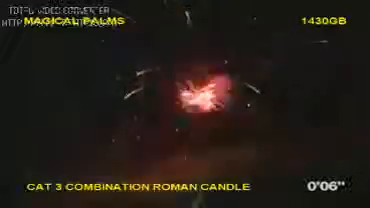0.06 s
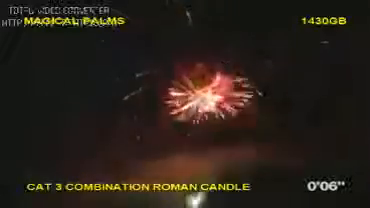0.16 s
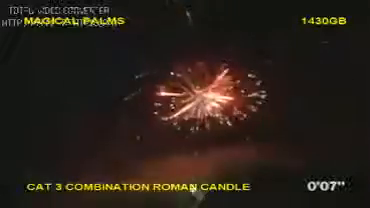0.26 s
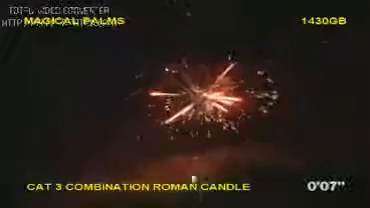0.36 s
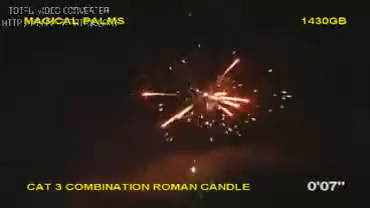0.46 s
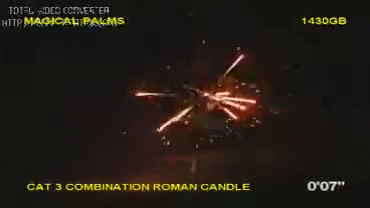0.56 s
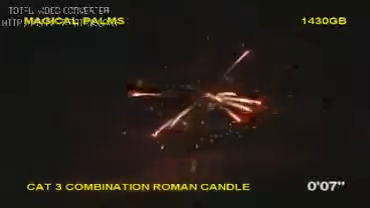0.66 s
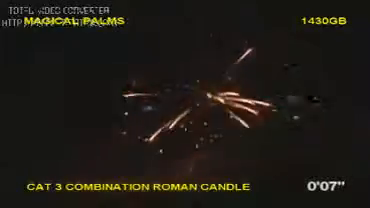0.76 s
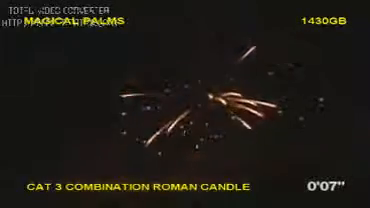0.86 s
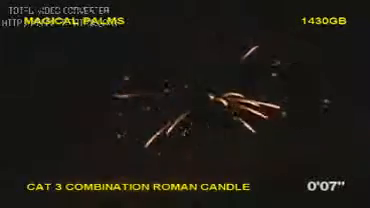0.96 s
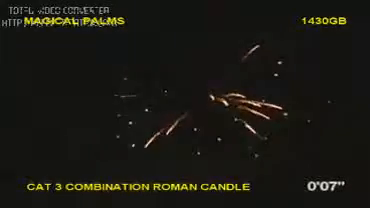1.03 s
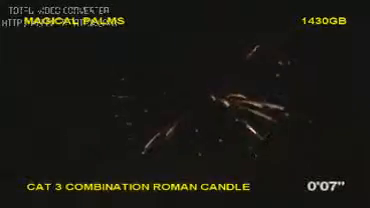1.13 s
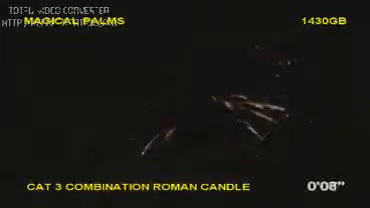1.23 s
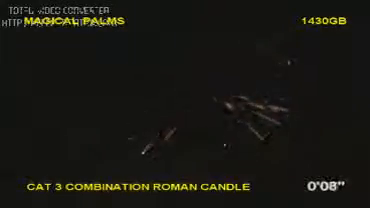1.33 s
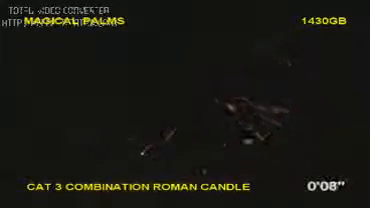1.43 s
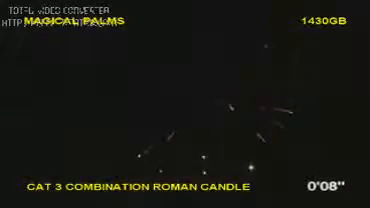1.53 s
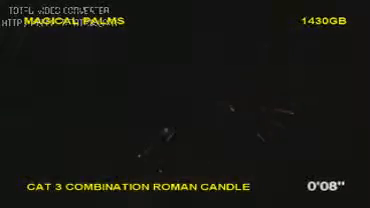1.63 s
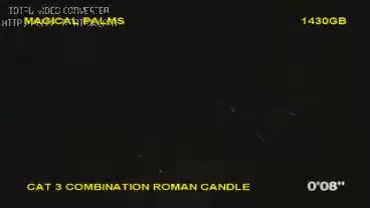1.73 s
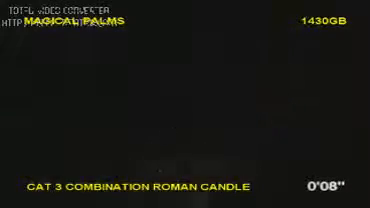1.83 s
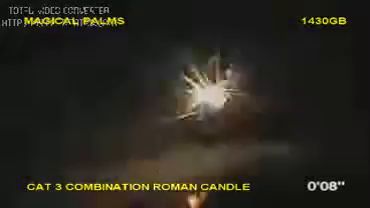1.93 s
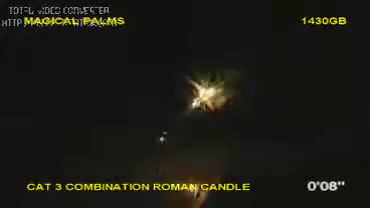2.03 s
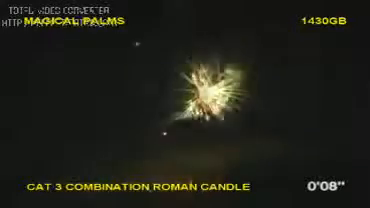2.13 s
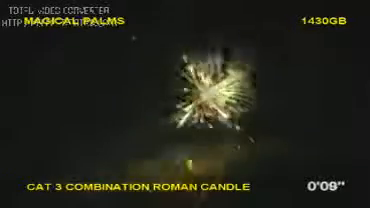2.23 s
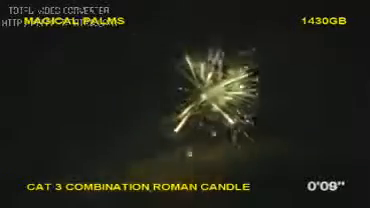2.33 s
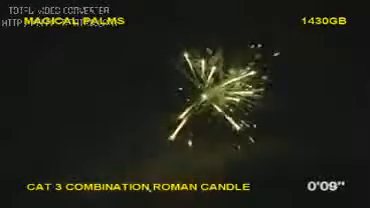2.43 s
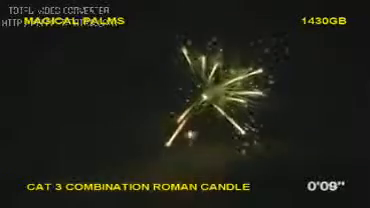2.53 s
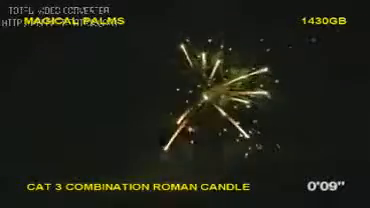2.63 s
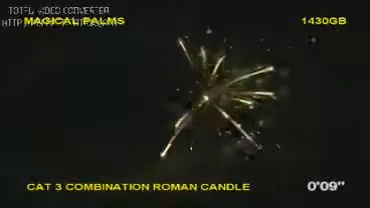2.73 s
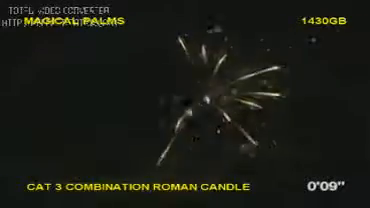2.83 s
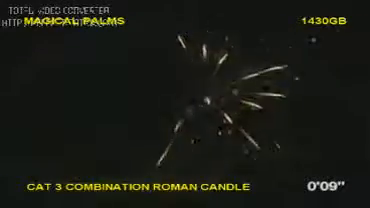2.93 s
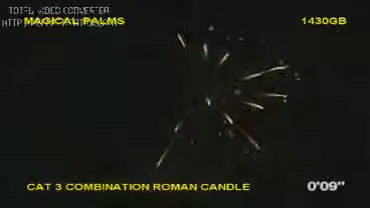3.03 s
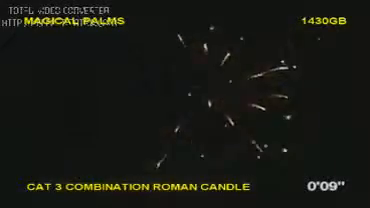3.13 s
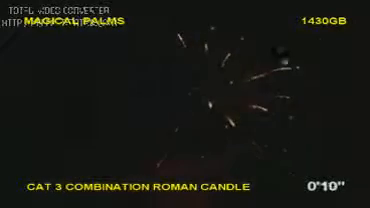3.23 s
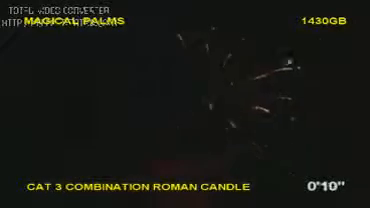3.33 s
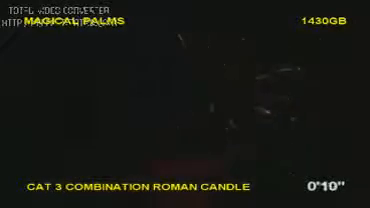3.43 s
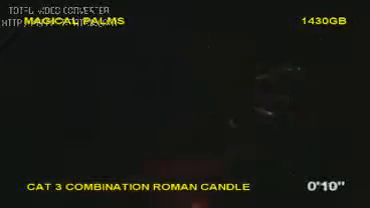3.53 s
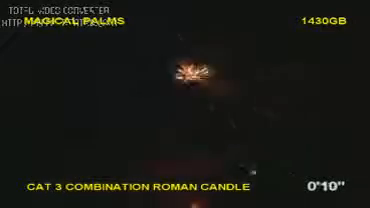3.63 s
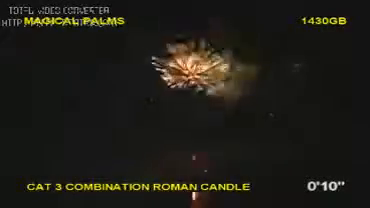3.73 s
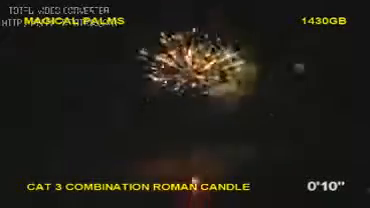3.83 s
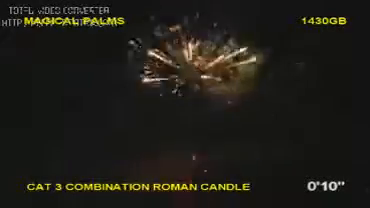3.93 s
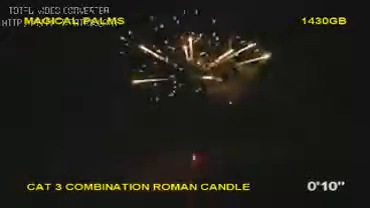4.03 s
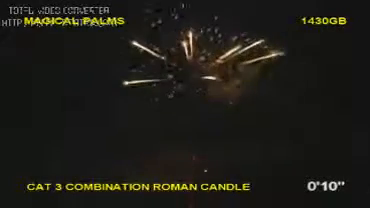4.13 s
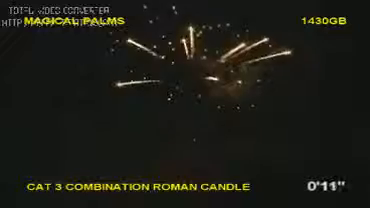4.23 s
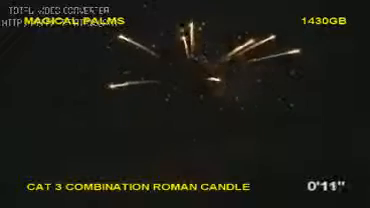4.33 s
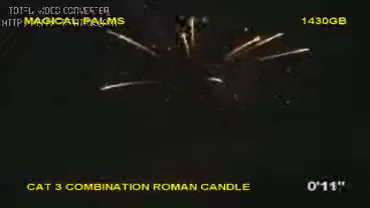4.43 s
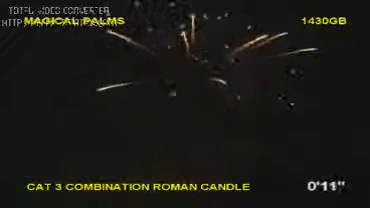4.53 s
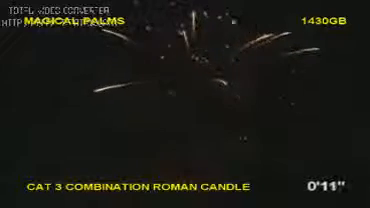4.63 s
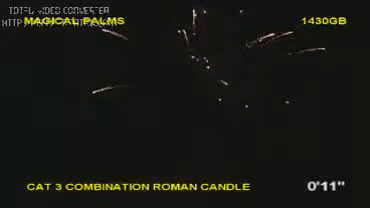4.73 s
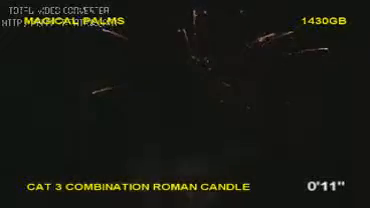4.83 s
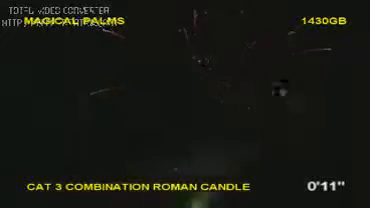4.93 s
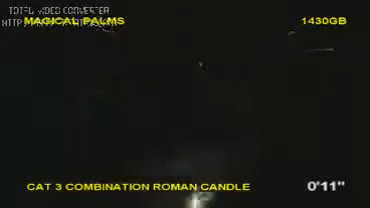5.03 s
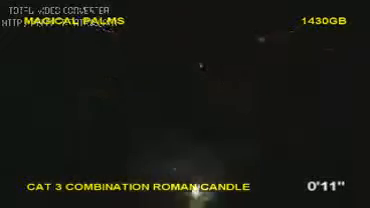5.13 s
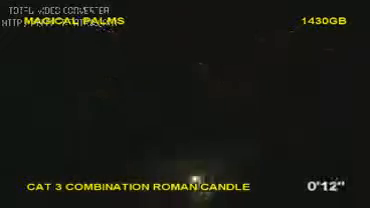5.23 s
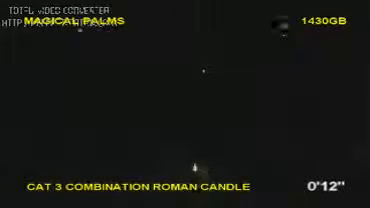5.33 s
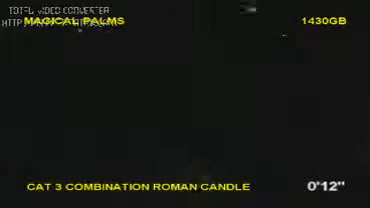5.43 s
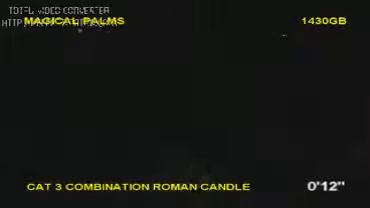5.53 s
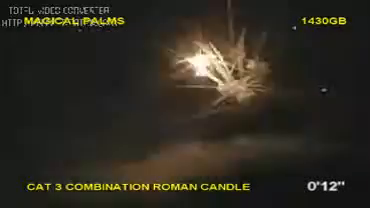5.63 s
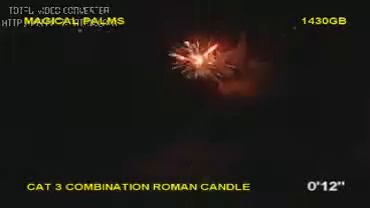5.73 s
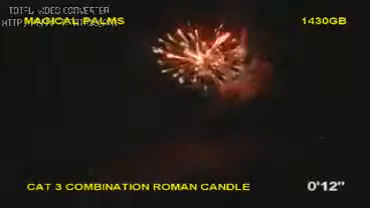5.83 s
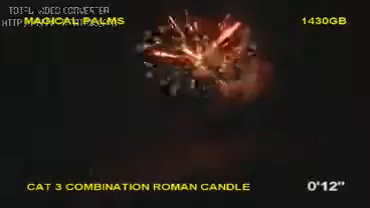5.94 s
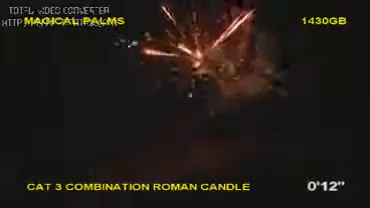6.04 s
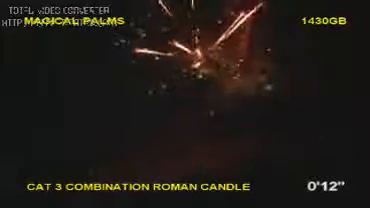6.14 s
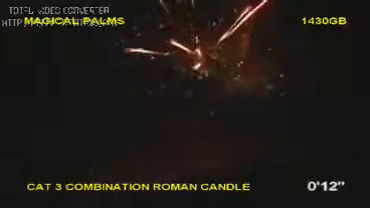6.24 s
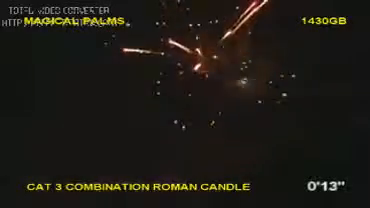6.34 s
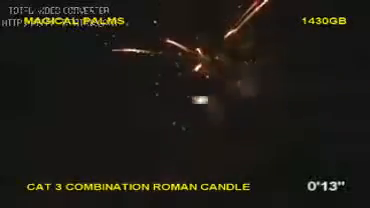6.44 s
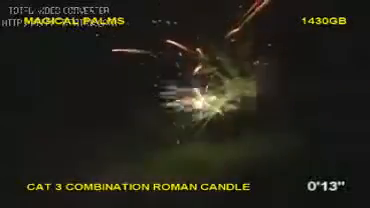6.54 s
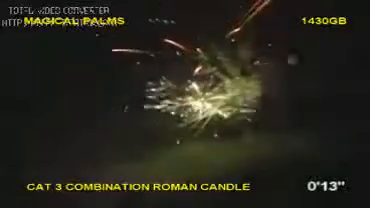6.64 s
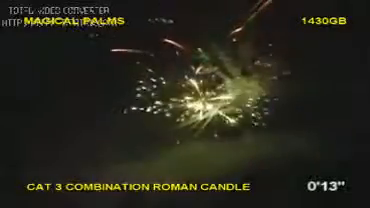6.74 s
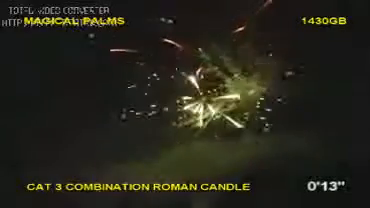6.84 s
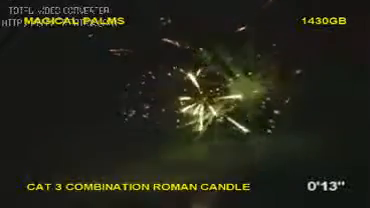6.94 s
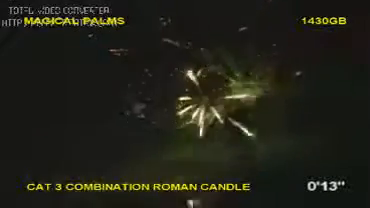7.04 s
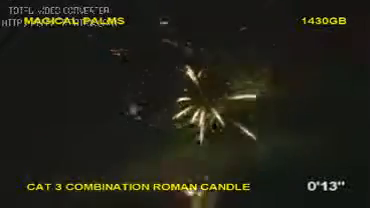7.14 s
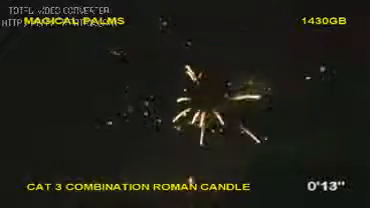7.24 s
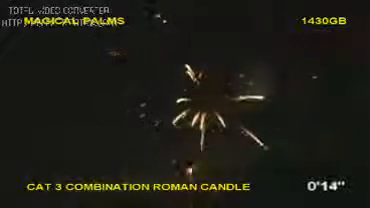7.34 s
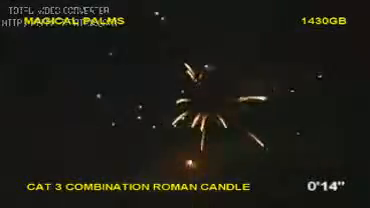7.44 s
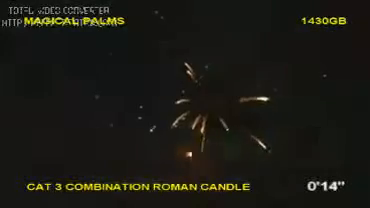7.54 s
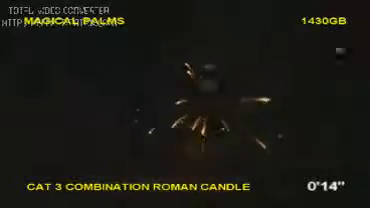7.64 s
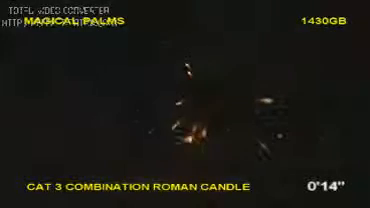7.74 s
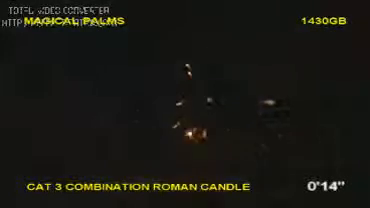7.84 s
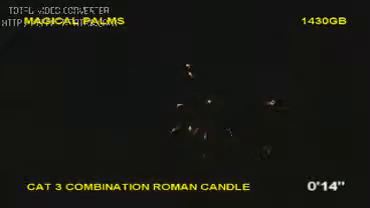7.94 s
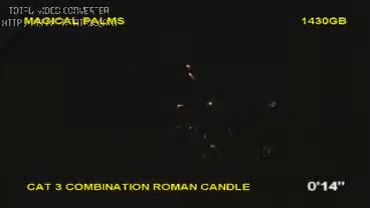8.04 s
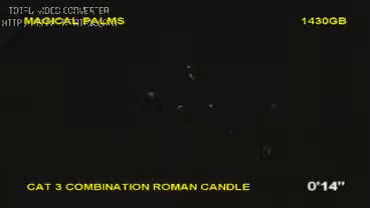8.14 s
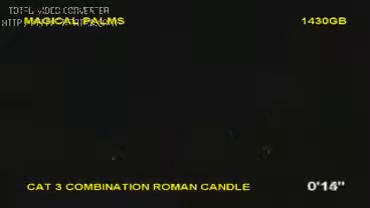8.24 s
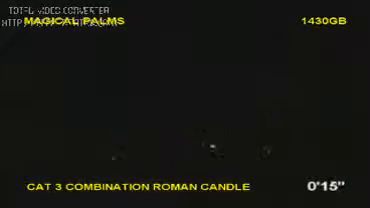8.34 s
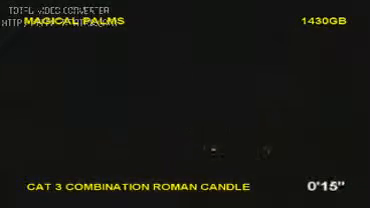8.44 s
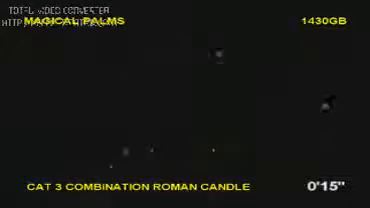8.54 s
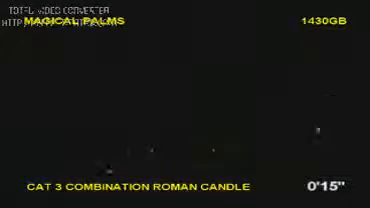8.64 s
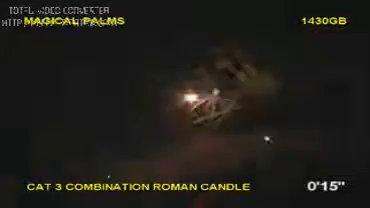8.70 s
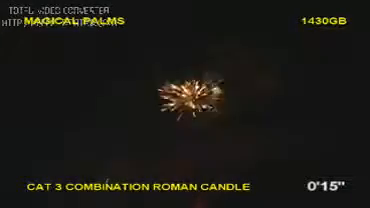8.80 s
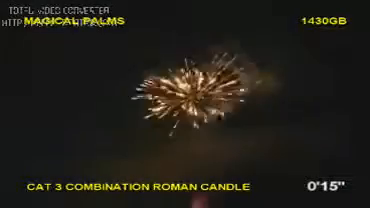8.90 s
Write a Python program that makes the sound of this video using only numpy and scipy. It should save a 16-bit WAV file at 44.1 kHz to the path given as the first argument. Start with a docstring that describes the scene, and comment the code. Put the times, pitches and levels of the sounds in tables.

```python
"""Open ground at night, among walls, trees and houses: a firework cake is firing. A thump lifts each shell
from the ground, a bang bursts it in the air; both are clicks rung through the colour of the blast.
Two microphones stand some 30 m apart, the left one nearer and set lower in gain. Walls throw back single
echoes, trees and houses a long scattered roll of coloured noise over a faint night background.
The bangs overload the recorder."""
import sys
import numpy as np
from scipy import signal
from scipy.fft import rfft, irfft
from scipy.io import wavfile

SR = 44100
rng = np.random.default_rng(int(sys.argv[2]) if len(sys.argv) > 2 else 0)


def store_pcm(level_fs):
    """Save levels as 16-bit WAV."""
    pcm = np.round(np.clip(level_fs, -1, 1) * 32767).astype(np.int16)
    wavfile.write(sys.argv[1], SR, np.atleast_2d(pcm).T)


N = 395577

# colours shared by sharp edges, deep bass and roll: (f/Hz, level/dB)
HISS_COLOUR = [(1500, -25), (2500, 0.1), (3300, -3.5), (4300, -4.5), (5500, -28)]
RUMBLE_COLOUR = [(20, -19), (40, -10.5), (70, -6), (110, 0.1), (160, -5), (300, -40)]
# the top treble at the left microphone: (f/Hz, level/dB)
SIZZLE_COLOUR_LEFT = [(3300, -25), (4300, -1.5), (4800, 0.1), (6000, -5.5), (6800, -14), (7500, -19),
                      (9000, -40)]
# the top treble at the right microphone: (f/Hz, level/dB)
SIZZLE_COLOUR_RIGHT = [(3500, -22), (4600, -2.5), (5300, .5), (6200, 0.1), (7600, -4.5), (9000, -40)]

USUAL_LAG_S = .082  # right microphone after left, for a burst in its usual place
NEARER_DB_S = 350  # an echo whose path is shortened by the burst's place comes back louder
PUNCH_DB, LIFT_PUNCH_DB = -12.5, 4  # deep bass of a blast, and what a lift pushes beyond that
SPRAY_S = .003  # decay time of the ragged noise after a sharp edge
SPRAY_DB, LIFT_SPRAY_DB = -19, -13  # the ragged noise is stronger for a lift than for a burst
BURST_ROLL_S, LIFT_ROLL_S, RUN_OUT_DB_S = 2.05, .95, 25  # how far scatterers reach, and the fade beyond
# Loss of the sharp edge with echo delay; far walls return little of a lift above the split
EDGE_LOST_DB_S, MUZZLE_EDGE_LOST_DB_S, MUZZLE_SPLIT_HZ = 21, 26, 2800
BASS_KEPT_DB_S, BLOOM_LOST_DB_S = 5.5, 7  # long paths keep deep bass and lose the upper boom
NEAR_S, NEAR_RUMBLE_DB = .05, -18  # near scatterers are too small for deep bass
RATTLE_FADE_SHARE = .4  # where the rattle's fade lies, from boom (0) to hiss (1)
CROSSTALK_DB, CROSSTALK_HZ = -19, 3700  # treble that leaks between the two channels
LINK_HZ, TOP_HZ, BOTTOM_HZ = 7700, 8646, 15


def undb(db):
    """Gain for a level in dB."""
    return 10 ** (np.asarray(db) / 20)


def ring(colour, peak_one=True):
    """Causal impulse response with this colour (folded cepstrum of the log gain)."""
    hz, db = np.transpose(colour)
    grid = np.log(np.arange(4097) * SR / 8192 + 1)  # the 1 Hz keeps the log finite
    cepstrum = irfft(np.log(undb(np.interp(grid, np.log(hz), db))))
    # fold the late half onto the early one: minimum phase
    cepstrum[1:4096] *= 2
    cepstrum[4097:] = 0
    response = irfft(np.exp(rfft(cepstrum)))[:4096]
    return response / np.abs(response).max() if peak_one else response


def through(sound, response):
    """Ring a track through an impulse response, kept to the length of the scene."""
    return signal.oaconvolve(sound, response)[:N]


def bursts(side, air_db_s):
    """Shells burst in the air: a low thump, a short push and pull, and a sharp edge of treble."""
    # bursts; those before zero leave only later echoes and roll: (left t/s, right t/s, level/dB)
    burst_shots = [(-1.5, -1.42, 0.1), (.2485, .3305, 0.1), (2.2477, 2.3297, 0.1), (3.8579, 3.9363, 0.1),
                   (5.9381, 6.0134, 0.1), (6.6742, 6.7564, 0.1)]
    # direct sound and wall echoes, left: (t/s after arrival, thump level/dB, crack level/dB,
    # change of delay per change of the left-right lag)
    burst_walls_left = [(0, -6, 9, 0), (.001, -9, 8, 0), (.0118, -21, -23, 0), (.044, -23, -33, 0),
                        (.0603, -23, -38, 0), (.1357, -33, -51, 0), (.209, -21, -43, -.6),
                        (.230, -23, -40, 1.4), (.301, -29, -50, 0), (.346, -29, -46, 0),
                        (.387, -27, -41, .4), (.4157, -20, -39, 0), (.448, -28, -50, 0),
                        (.542, -31, -55, 0), (.6577, -30, -43, 1.4), (.692, -32, -55, 0),
                        (.721, -33, -50, 1), (.745, -32, -52, 1), (.7896, -30, -55, 3.2),
                        (.829, -26, -41, 2.8), (1.4336, -41, -54, 0)]
    # direct sound and wall echoes, right: the same columns
    burst_walls_right = [(0, 2.5, 11, 0), (.0041, 2.5, 7, -.07), (.0143, -3, 5, 0), (.021, -4, -24, 0),
                         (.041, -22, -27, 0), (.0508, -20.5, -25, -.3), (.064, -11, -16, -.1),
                         (.1055, -13, -7, -.1), (.110, -11, -20, -.1), (.143, -15, -13, 0),
                         (.150, -11, -15, .6), (.161, -11, -23, 0), (.195, -17, -32, 0),
                         (.226, -9.5, -30, .3), (.2305, -11, -34, .3), (.235, -6.5, -27, .3),
                         (.2395, -12, -34, .3), (.274, -17, -30, 0), (.324, -18, -33, 0),
                         (.346, -22, -27, 0), (.389, -17, -32, 0), (.449, -23, -29, 0), (.460, -19, -33, 0),
                         (.493, -15, -34, 2.2), (.550, -21, -29, 0), (.574, -22, -36, 0),
                         (.608, -22, -30, 0), (.6498, -25, -19.5, 1.7), (.695, -24, -36, 1),
                         (.746, -25, -37, 1), (.846, -26, -38, 1), (1.148, -28, -47, 0),
                         (1.3435, -36, -32, 0), (1.382, -36, -39, 0), (1.466, -40, -38, 0),
                         (1.761, -45, -41, 0), (1.7916, -38, -37, 0)]
    # groups of scatterers, left: (t/s after arrival, build-up t/s, boom level/dB, rattle level/dB,
    # hiss level/dB, boom fade/(dB/s), hiss fade/(dB/s))
    burst_scatter_left = [(0, .012, -10, -15, -24, 800, 1400), (0, .012, -21, -32, -61, 230, 200),
                          (.14, .03, -33.5, -52, -57.5, 17, 23), (.36, .025, -38, -51, -58, 24, 31),
                          (.5, .2, -55.5, -70, -84, 5, 4)]
    # groups of scatterers, right: the same columns
    burst_scatter_right = [(0, .012, -8, -6, -18.5, 470, 1000), (0, .012, -23, -31.5, -41, 60, 60),
                           (.085, .01, -22, -26, -27.5, 40, 120), (.14, .05, -22.5, -33, -39.5, 27, 33),
                           (.34, .03, -25.5, -32, -39.5, 22, 29), (.5, .2, -43, -52, -72, 5.5, 6)]
    # the push and pull of a burst: (f/Hz, level/dB)
    blast_colour = [(25, -30), (100, -15), (215, 0.1), (300, -1.5), (450, -1.5), (650, -5), (1000, -11.5),
                    (2000, -27), (4000, -46), (9000, -75)]

    walls = (burst_walls_left, burst_walls_right)[side]
    scatter = (burst_scatter_left, burst_scatter_right)[side]
    thump, crack, edge = echo_clicks(burst_shots, side, walls, scatter_db=1.8, blunt_db_s=EDGE_LOST_DB_S)
    spread = roll_power(scatter, BURST_ROLL_S, rumble_db=-18.5, sizzle_db=-1.5, air_db_s=air_db_s, bloom_db=-3)
    edge = ragged(edge, SPRAY_DB, rng.standard_normal(size=N))
    snap_db = (-28, -12.5)[side]
    bang = thump_sound(thump, PUNCH_DB) + through(crack, ring(blast_colour))
    bang += through(edge * undb(snap_db - 10.5), ring(HISS_COLOUR))
    bang += through(edge * undb(snap_db), ring((SIZZLE_COLOUR_LEFT, SIZZLE_COLOUR_RIGHT)[side]))
    return bang, shot_power(burst_shots, side, spread)


def lifts(side, air_db_s):
    """Charges lift the shells: gas leaves the tube as a slow thump with a harder muzzle crack."""
    # lifts from the ground: (left t/s, right t/s, level/dB)
    lift_shots = [(-.018, .08, -3.5), (1.8204, 1.9184, 0.1), (3.5871, 3.6851, 1.1), (4.8864, 4.9842, -1.1),
                  (8.7737, 8.8716, 0.1)]
    # direct sound and wall echoes, left: (t/s after arrival, thump level/dB, crack level/dB)
    lift_walls_left = [(0, -16, -29.5), (.031, -22, -40), (.222, -25, -55), (.254, -31, -50),
                       (.3986, -40, -47), (.428, -32, -55), (.438, -35, -46), (.773, -53, -56)]
    # direct sound and wall echoes, right: the same columns
    lift_walls_right = [(0, -5, -15.5), (.015, -11, -38), (.023, -25, -29), (.0294, -7.5, -26),
                        (.042, -15, -35), (.049, -22, -34), (.0995, -30, -34), (.110, -11.5, -23),
                        (.151, -29, -32), (.1637, -21, -31), (.241, -18.5, -28.5), (.272, -24, -33),
                        (.3925, -21, -24), (.436, -30, -23), (.512, -36, -32), (.5297, -40, -35)]
    # groups of scatterers, left: (t/s after arrival, build-up t/s, boom level/dB, rattle level/dB,
    # hiss level/dB, boom fade/(dB/s), hiss fade/(dB/s))
    lift_scatter_left = [(0, .02, -20, -47, -45, 450, 300), (.022, .005, -36, -44, -41, 220, 400),
                         (.08, .015, -47, -63, -66, 15, 25), (.2, .012, -50, -66, -55, 60, 150),
                         (.36, .015, -57, -65, -61, 34, 80)]
    # groups of scatterers, right: the same columns
    lift_scatter_right = [(0, .02, -12, -32, -38, 520, 400), (.019, .006, -22.5, -30, -34, 270, 450),
                          (.085, .015, -31.5, -40, -46, 45, 55), (.25, .015, -32, -43, -53, 50, 80),
                          (.375, .015, -37, -47, -56.5, 34, 42)]
    # muzzle crack at the left microphone: (f/Hz, level/dB)
    muzzle_colour_left = [(420, -18), (720, -1), (1050, -11), (1700, -9), (2600, -11), (4200, -5),
                          (5800, -13), (7200, -26), (9000, -45)]
    # muzzle crack at the right microphone: (f/Hz, level/dB)
    muzzle_colour_right = [(420, -18), (720, -6), (1050, -9), (1450, -4), (1700, 0.1), (2050, -11),
                           (2500, -4.5), (3100, -18), (4300, -9), (5800, -24), (7000, -17), (7600, -18),
                           (9000, -40)]

    walls = (lift_walls_left, lift_walls_right)[side]
    scatter = (lift_scatter_left, lift_scatter_right)[side]
    thump, muzzle, muzzle_edge = echo_clicks(lift_shots, side, walls, scatter_db=.8,
                                             blunt_db_s=MUZZLE_EDGE_LOST_DB_S)
    spread = roll_power(scatter, LIFT_ROLL_S, rumble_db=-8.5, sizzle_db=-5, air_db_s=air_db_s, bloom_db=-12)
    # gas leaves the tube more slowly than a shell bursts
    push = np.hanning(int(.0016 * SR))
    thump = np.convolve(thump, 1.2 * push / push.sum(), mode="same")
    noise = rng.standard_normal(size=N)
    muzzle = ragged(muzzle, LIFT_SPRAY_DB, noise)
    muzzle_edge = ragged(muzzle_edge, LIFT_SPRAY_DB, noise)
    # full level below the split, blunted level above it
    dull = signal.butter(2, MUZZLE_SPLIT_HZ, fs=SR)
    muzzle = muzzle_edge + signal.lfilter(*dull, muzzle - muzzle_edge)
    muzzle_ring = ring((muzzle_colour_left, muzzle_colour_right)[side])
    lift = thump_sound(thump, PUNCH_DB + LIFT_PUNCH_DB) + undb(2.5) * through(muzzle, muzzle_ring)
    return lift, shot_power(lift_shots, side, spread)


def thump_sound(thump, punch_db):
    """The low body of a blast and, beneath it, the punch of its deepest bass."""
    # low body of a blast at the microphones: (f/Hz, level/dB)
    thump_colour = [(25, -24), (50, -17), (100, -13), (150, -8), (215, 0.1), (260, -.5), (310, -5),
                    (380, -4), (500, -9), (620, -18), (900, -27), (2000, -46)]
    return through(thump, ring(thump_colour)) + through(thump * undb(punch_db), ring(RUMBLE_COLOUR))


def ragged(clicks, spray_db, noise):
    """No wall is flat: the sharp edge of each echo arrives as a ragged spray of decaying noise."""
    tail = signal.lfilter([0, 1], [1, -np.exp(-1 / SPRAY_S / SR)], clicks)
    return clicks + undb(spray_db) * noise * tail


def add(track, s, size):
    """A click at time s, if it falls within the scene."""
    i = int(round(s * SR))
    if 0 <= i < N:
        track[i] += size


def echo_clicks(table, side, echoes, scatter_db, blunt_db_s):
    """Clicks for thump, crack and sharp edge: each wall returns a shot late, and its edge blunted by delay."""
    clicks = np.zeros((3, N))
    for shot in table:
        start, strength_db = shot[side], shot[2]
        moved = shot[1] - shot[0] - USUAL_LAG_S
        chance = scatter_db * rng.standard_normal((len(echoes), 2))
        for (delay, thump_db, crack_db, *slide), (thump_luck, crack_luck) in zip(echoes, chance):
            later = sum(slide) * moved  # s; slide is empty for a lift
            common_db = strength_db - NEARER_DB_S * later
            arrival = start + delay + later
            add(clicks[0], arrival, undb(thump_db + thump_luck + common_db))
            add(clicks[1], arrival, undb(crack_db + crack_luck + common_db))
            add(clicks[2], arrival, undb(crack_db - blunt_db_s * delay + crack_luck + common_db))
    return clicks


def roll_power(scatter, roll_s, rumble_db, sizzle_db, air_db_s, bloom_db):
    """Roll after one shot, as power in six bands each ms: groups of scatterers build up and fade."""
    after, power = np.arange(0, 4, .001), 0
    far = np.minimum(after, roll_s)
    for start, build_s, boom, rattle, hiss, boom_fade, hiss_fade in scatter:
        age = np.clip(after - start, 0, None)
        rattle_fade = boom_fade + RATTLE_FADE_SHARE * (hiss_fade - boom_fade)
        boom = boom - boom_fade * age
        rattle = rattle - rattle_fade * age
        hiss = hiss - hiss_fade * age
        rumble = boom + rumble_db + BASS_KEPT_DB_S * far + NEAR_RUMBLE_DB * (start < NEAR_S)
        sizzle = hiss + sizzle_db - air_db_s * far
        bloom = boom + bloom_db - BLOOM_LOST_DB_S * far
        bands = np.array([boom, rattle, hiss - 3, rumble, sizzle, bloom])
        power = power + (1 - np.exp(-age / build_s)) ** 2 * undb(2 * bands)
    return after, power * undb(-2 * RUN_OUT_DB_S * (after - far))


def shot_power(table, side, spread):
    """Power of the roll over the scene, in six bands each ms: the rolls of all shots add up."""
    after, bands = spread
    t, power = np.arange(0, N / SR, .001), 0
    for shot in table:
        rolled = np.array([np.interp(t - shot[side], after, band, 0, 0) for band in bands])
        power = power + undb(2 * shot[2]) * rolled
    return power


def lumps(rate, spread_db):
    """Gain that wanders (rate in steps a second) as nearer and further scatterers answer."""
    steps = rng.standard_normal(size=2000)
    return undb(spread_db * np.interp(np.arange(N) / SR * rate, np.arange(len(steps)), steps))


def roll_sound(power, side):
    """Trees and houses scatter the blasts: six bands of uneven noise, each with its own colour."""
    # body of the roll: (f/Hz, level/dB)
    boom_colour = [(25, -24), (55, -19), (100, -12), (150, -6), (205, -.8), (265, -1.5), (330, -3.5),
                   (420, -11), (620, -27), (900, -36), (2000, -55)]
    # mid band of the roll: (f/Hz, level/dB)
    rattle_colour = [(300, -30), (560, -11), (750, -4), (1020, 0.1), (1350, -5), (2000, -8.5),
                     (2600, -14.5), (3500, -22), (5000, -45)]
    # upper part of the boom: (f/Hz, level/dB)
    bloom_colour = [(200, -30), (290, -7), (360, 0.1), (450, -1), (540, -4), (650, -14), (900, -17),
                    (2000, -40)]

    swell = lumps(11, 1.3)  # whole rows of houses answer in turn
    together, leaves = swell * lumps(45, 1.4), swell * lumps(60, 1.2)
    uneven = [together * lumps(90, 1.6), together * lumps(150, 1.1), leaves * lumps(170, 1.4),
              together, leaves * lumps(210, 1.4), together * lumps(70, 1.6)]
    sizzle_colour = (SIZZLE_COLOUR_LEFT, SIZZLE_COLOUR_RIGHT)[side]
    colours = boom_colour, rattle_colour, HISS_COLOUR, RUMBLE_COLOUR, sizzle_colour, bloom_colour
    ms, roll = np.arange(N) / SR * 1000, 0
    for level, gain, colour in zip(np.sqrt(power), uneven, colours):
        level = np.interp(ms, np.arange(len(level)), level)
        noise = level * rng.standard_normal(size=N) * gain
        response = ring(colour)
        roll = roll + through(noise / np.linalg.norm(response), response)
    return roll


def night_power(side):
    """The night background: a constant power in each band, later made uneven along with the roll."""
    # row left, row right: (boom, rattle, hiss, rumble, sizzle, bloom level/dB)
    night_levels = [(-66, -80, -94, -72, -90, -70), (-54, -66, -88, -60, -88, -58)]
    return undb(2 * np.array(night_levels[side]))[:, None]


def microphone(side):
    """All that reaches one microphone (0 left, 1 right): bursts, lifts, their roll and the night."""
    air_db_s = (1.5, 8)[side]  # top treble lost along the roll's paths
    burst, burst_power = bursts(side, air_db_s)
    lift, lift_power = lifts(side, air_db_s)
    return burst + lift + roll_sound(lift_power + burst_power + night_power(side), side)


def scene():
    """The two microphones go to left and right."""
    return np.array([microphone(0), microphone(1)])


def record(dry):
    """The bangs are squared off inside an emphasised link; some treble leaks across; the band ends near 8 kHz."""
    # raised before the overload, lowered after: (f/Hz, level/dB)
    emphasis = [(20, -11), (45, -8), (90, 0.1), (2200, 0.1), (3300, 3), (4300, -1), (6500, -3.5),
                (9000, -1.5)]
    # where the overload flattens, row left, row right: (amplitude)
    ceiling = [
        [.56],
        [.67],
    ]

    raise_ring = ring(emphasis, peak_one=False)
    lower_ring = ring(np.multiply(emphasis, [1, -1]), peak_one=False)
    raised = signal.oaconvolve(dry, raise_ring[None])[:, :N]
    squared = raised / (1 + np.abs(raised / ceiling) ** 4) ** (1 / 4)
    lowered = signal.oaconvolve(squared, lower_ring[None])[:, :N]
    lowered = signal.lfilter(*signal.butter(1, BOTTOM_HZ, "high", fs=SR), lowered)
    treble = signal.sosfilt(signal.butter(4, CROSSTALK_HZ, "high", fs=SR, output="sos"), lowered)
    mixed = lowered + undb(CROSSTALK_DB) * treble[::-1]  # left and right swapped
    narrow = signal.sosfilt(signal.ellip(8, .3, 30, LINK_HZ, fs=SR, output="sos"), mixed)
    return signal.sosfilt(signal.ellip(8, .2, 70, TOP_HZ, fs=SR, output="sos"), narrow)


dry = scene()
out = record(dry)
store_pcm(out)
```